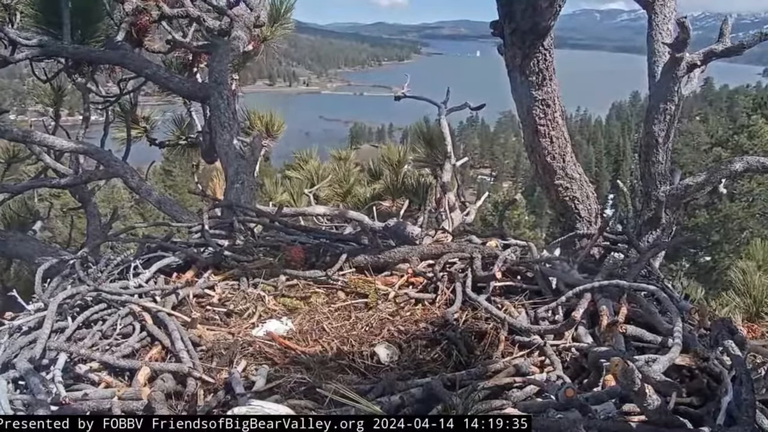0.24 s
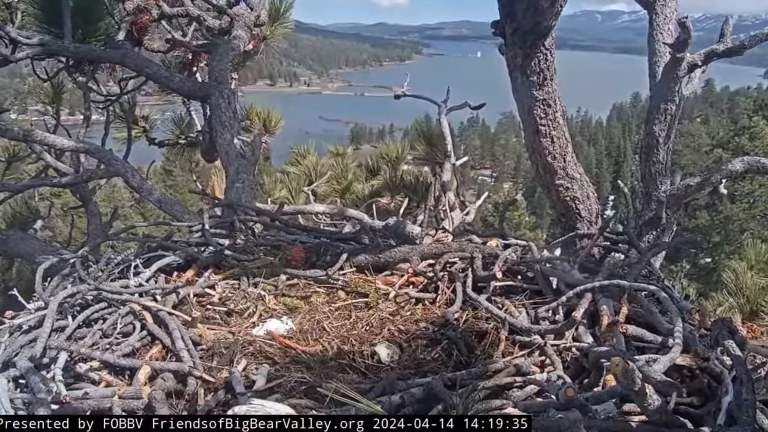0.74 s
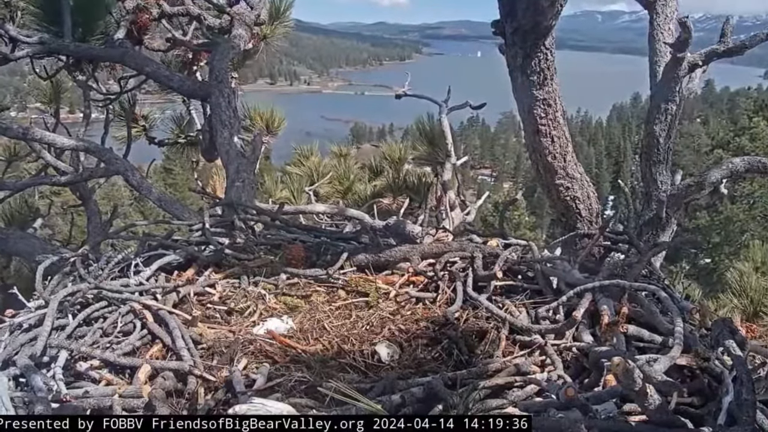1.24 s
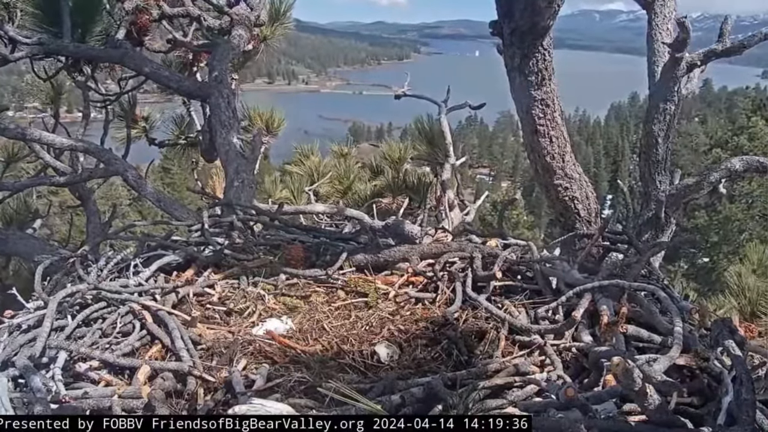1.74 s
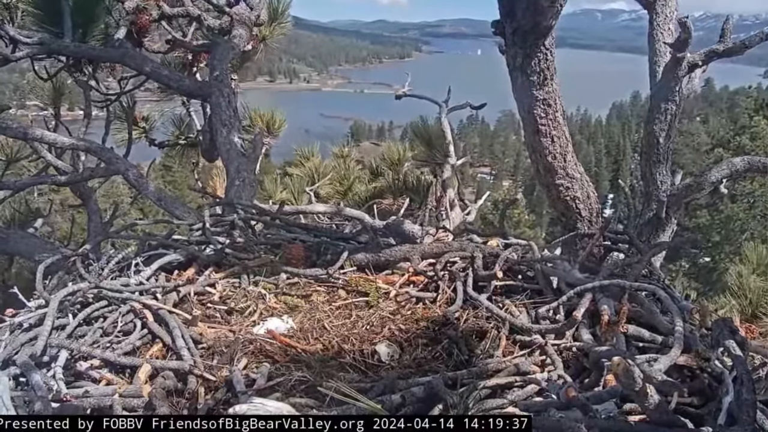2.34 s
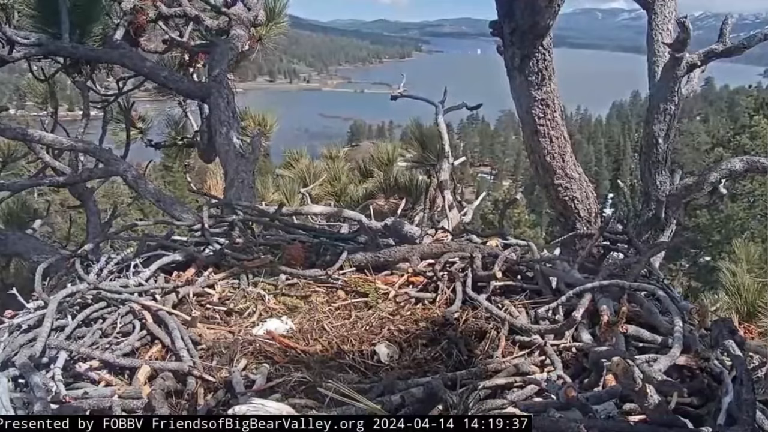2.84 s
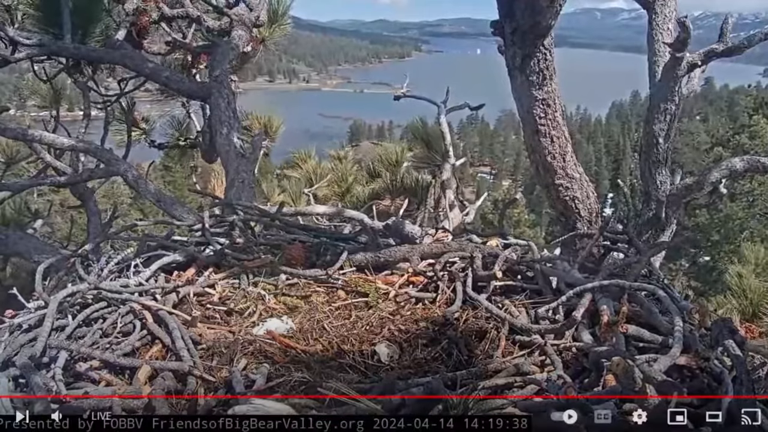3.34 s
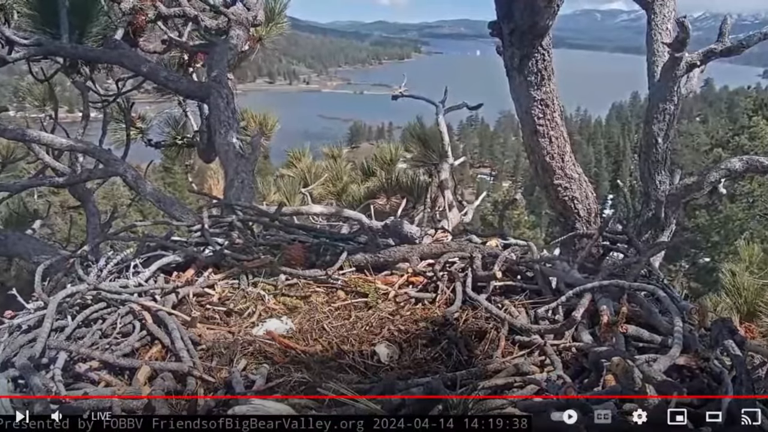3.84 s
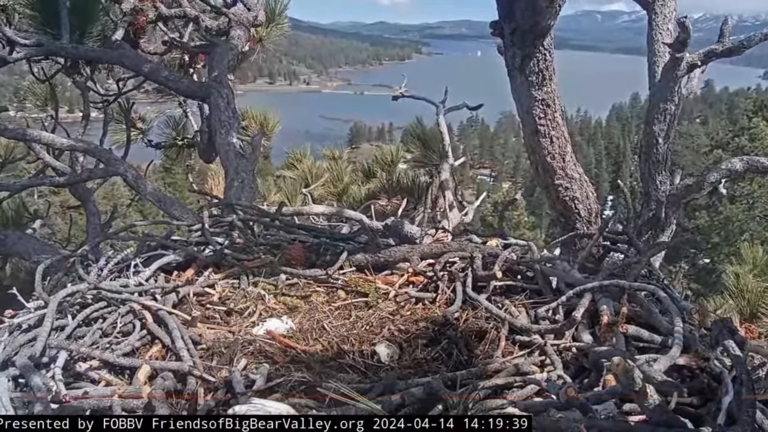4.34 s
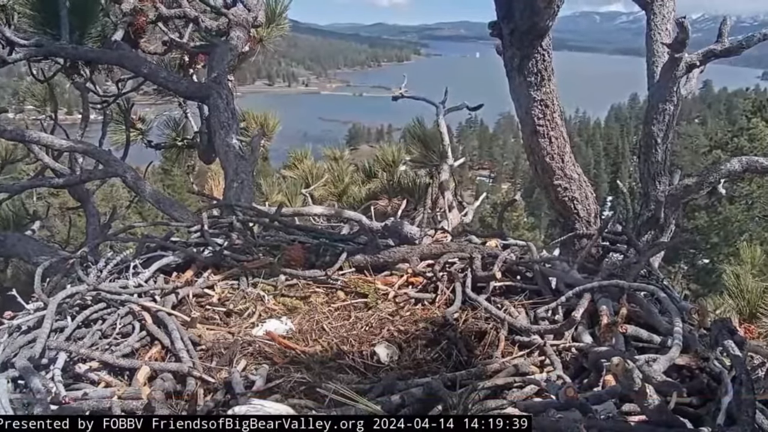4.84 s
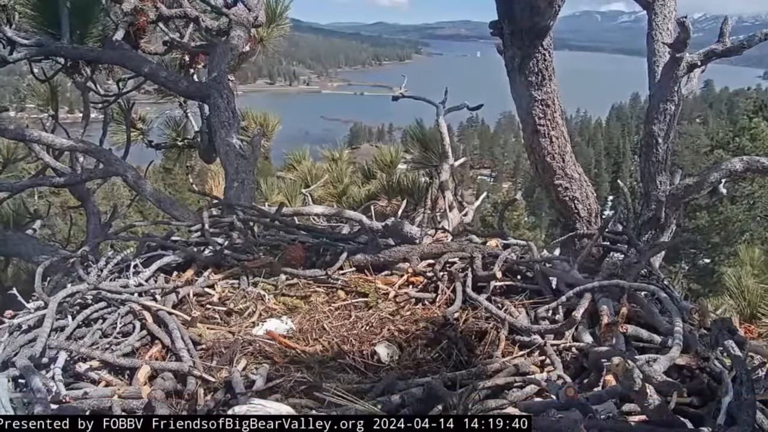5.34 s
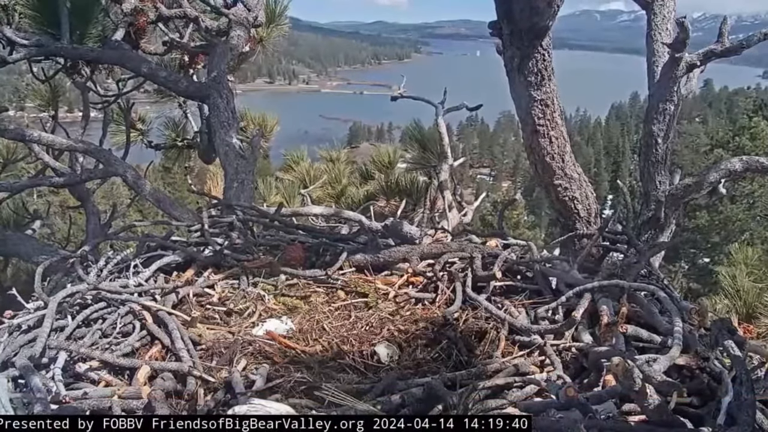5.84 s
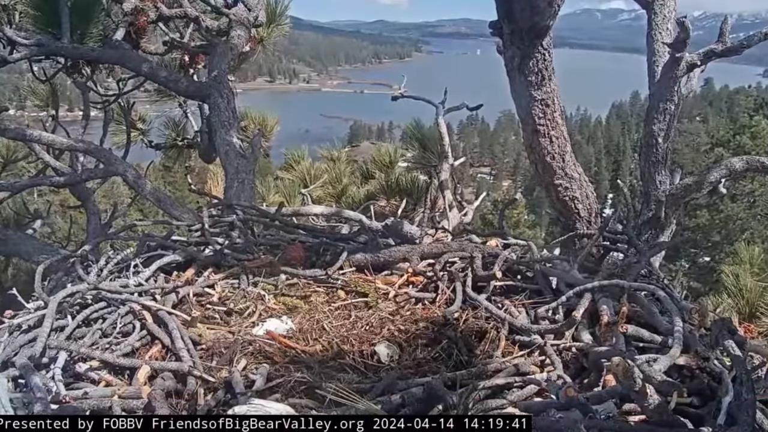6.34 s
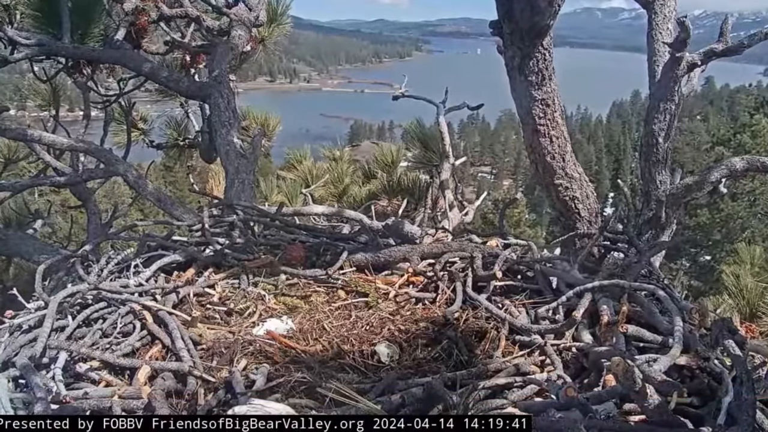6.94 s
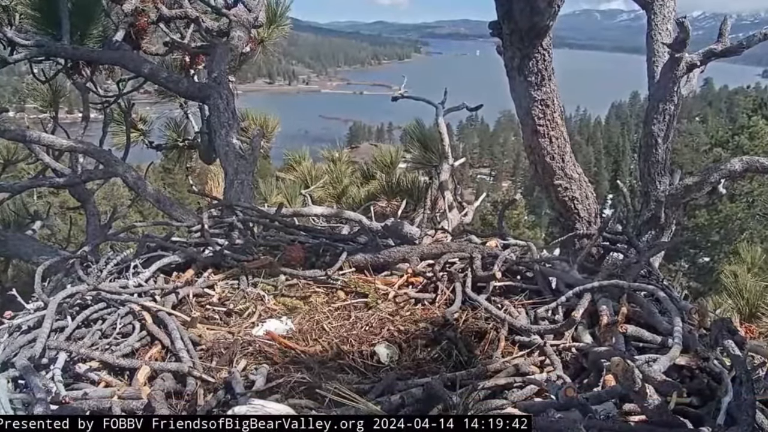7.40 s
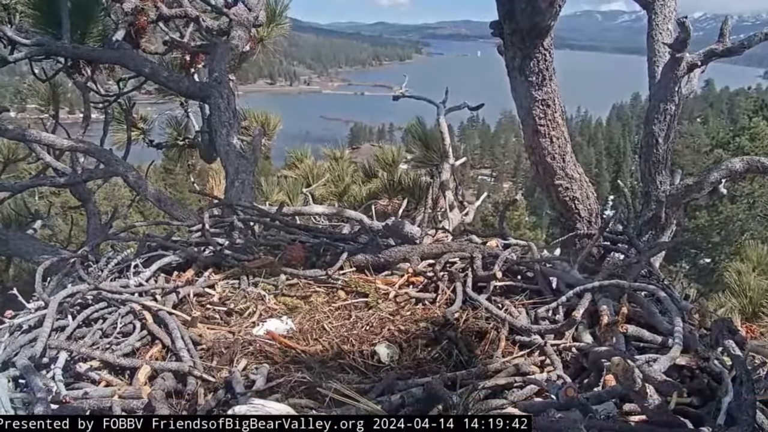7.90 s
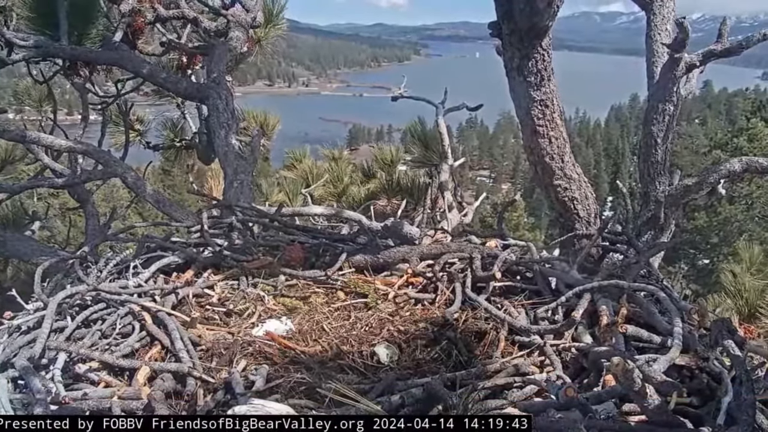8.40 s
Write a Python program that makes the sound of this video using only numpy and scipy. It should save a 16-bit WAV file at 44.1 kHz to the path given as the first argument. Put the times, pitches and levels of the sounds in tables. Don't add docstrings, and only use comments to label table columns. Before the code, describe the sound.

Wind blows through a pine around an open stick nest. A soft needle hiss lies over a deep, uneven rumble buffeting a small sheltered microphone. A nearby bough swishes early, then dry snaps and bright grit ticks cluster in a stronger gust. Past the middle, dull needle flicks patter against bark before things calm somewhat. Tiny dropouts roughen the strongest gusts.

```python
import sys
import numpy as np
from scipy import signal
from scipy.fft import rfft, irfft
from scipy.io import wavfile
from scipy.ndimage import uniform_filter1d

SR = 44100
rng = np.random.default_rng(int(sys.argv[2]) if len(sys.argv) > 2 else 0)


def makeup_ratio(level_db):
    decades = np.asarray(level_db, float) / 20
    return 10 ** decades


def output_pcm(signal):
    pcm = np.clip(np.atleast_2d(signal).T, -1, 1) * 32767
    wavfile.write(sys.argv[1], SR, np.round(pcm).astype(np.int16))


N = 381992

# (frequency [Hz], density [dB per Hz])
SIZZLE_SPECTRUM = [(1710, -6.5), (2900, -7.5), (3330, -4.5), (3910, -4.5), (4590, -1), (5270, -6),
                   (6400, -18), (10800, -29), (12000, -35), (13600, -29.5), (14100, -32), (15300, -58)]
# (time [s], level [dB])
BUSTLE = [
    (0, -10),
    (1.1, -6),
    (1.4, 0),
    (2.3, 7.5),
    (2.8, 5.5),
    (5.0, -3),
    (5.9, 4),
    (6.4, 5.5),
    (7.0, -1.5),
    (8.7, -3),
]


def needle_hiss(hiss_db, push_db, together):
    # (frequency [Hz], density [dB per Hz])
    hiss_spectrum = [(250, -36), (420, -6), (593, -9), (921, -7), (1560, 0), (1880, 1), (2550, -12),
                     (3300, -26), (4290, -53), (7260, -120)]
    return makeup_ratio(hiss_db + 0.77) * needles(hiss_spectrum, together, push_db, shared_db=0.92, own_db=0.06)


def needle_sizzle(push_db, together):
    mean_db, wind_share, bustle_share = -52, 0.48, 0.12
    sizzle_db = mean_db + wind_share * push_db + bustle_share * in_time(BUSTLE)[0] + swish()
    noise = needles(SIZZLE_SPECTRUM, together, push_db, shared_db=0.43, own_db=0.0)
    return makeup_ratio(sizzle_db + 1.0) * (noise + grit())


def needles(spectrum, together, push_db, shared_db, own_db):
    sough_hz, sough_octaves, sough_gain = 1250, 0.28, 0.7
    edges = 300 * 2 ** np.arange(0, 6.1, 0.5)
    white = rng.standard_normal((2, N))
    out = 0
    for k, (low, high) in enumerate(zip(edges, edges[1:])):
        octaves_off = np.log2(np.sqrt(low * high) / sough_hz)
        sough = sough_gain * np.exp(-(octaves_off / sough_octaves) ** 2)
        flicker_db = sough * push_db + shared_db * together + own_db * drift(5.9)
        out = out + band(white[k % 2], low, high) * makeup_ratio(flicker_db)
    return coloured(out, spectrum)


def swish():
    peak_s, rise_s, fall_s, peak_db = 0.3, 0.06, 0.44, 4
    since = np.arange(N) / SR - peak_s
    return peak_db * np.exp(-(since / np.where(since < 0, rise_s, fall_s)) ** 2)


def buffeting(capsule_db, eddy_db):
    # (frequency [Hz], density [dB per Hz])
    buffet_spectrum = [(11, -50), (18, -46), (52, -4), (76, 1.5), (97, 3.5), (170, -14.5), (220, -27.5),
                       (370, -120)]
    return makeup_ratio(capsule_db - 0.5 + eddy_db) * eddies(buffet_spectrum, even=0.19)


def shelter_rumble(capsule_db, eddy_db):
    # (frequency [Hz], density [dB per Hz])
    rumble_spectrum = [(76, -31), (130, -3.5), (188, -4.5), (247, -3), (387, -14), (520, -36.5), (680, -44),
                       (1140, -120)]
    mean_db, wind_share, eddy_yield = -35.5, 0.75, 0.15
    rumble_db = mean_db + wind_share * (capsule_db - capsule_db.mean()) - eddy_yield * eddy_db
    return makeup_ratio(rumble_db) * eddies(rumble_spectrum, even=0.041)


def eddies(spectrum, even):
    x = coloured(rng.standard_normal(N), spectrum)
    swell = uniform_filter1d(np.abs(signal.hilbert(x)), size=300) + 1e-6
    return rms_one(x * swell ** -even)


def big_eddies():
    # (time [s], level [dB])
    strikes = [(0.51, -11), (0.79, -12), (1.21, -2), (1.33, 8), (1.76, 6), (1.81, -9), (2.02, 1),
               (2.12, -9), (2.58, 2.5), (2.77, -11), (3.09, 3), (3.16, -7), (3.67, 4), (3.74, -12),
               (4.05, 8.5), (4.34, 4), (4.8, 4.5), (4.85, -7), (5.26, 6.5), (5.31, -10), (5.37, 8.5),
               (5.86, 3.5), (6.15, -0.5), (6.25, 2.5), (7.33, -3), (8.2, -2), (8.35, -2), (8.47, 4.5),
               (8.54, -3), (8.6, 7.5)]
    half_length_s = 0.03
    t = np.arange(0, N, 40) / SR
    out = 0
    for s, db in strikes:
        out = out + db * np.exp(-((t - s) / half_length_s) ** 2)
    return np.interp(np.arange(N) / SR, t, out)


def capsule_free(push_db, edge_ms, longer_ms):
    # (time [s], duration [ms])
    long_rests = [(1.8926, 4.4), (2.2309, 3.6), (2.4411, 5.8), (2.4501, 4), (2.4622, 4.7), (2.5093, 3.7),
                  (2.5937, 5.6), (3.6237, 3.8), (3.6498, 3.4), (4.0203, 5.54), (5.3956, 3.5),
                  (5.6525, 6.67), (5.7039, 3.4), (6.0967, 4.2), (6.1267, 4), (6.1362, 6.1), (6.1509, 6.8),
                  (6.3986, 7.9), (6.4105, 4.7), (6.4876, 4.6), (6.5482, 5.4), (6.6065, 3.8), (6.6195, 6.2),
                  (6.631, 7.6), (6.6762, 5), (6.9162, 5.1), (7.5433, 4.6), (7.2341, 2.85), (7.9686, 4.6),
                  (8.034, 4.2)]
    touches_per_s, steepness, longest_ms = 6.5, 1.6, 3.3
    free, chance = np.ones(N), rng.random((2, N))
    touched = np.flatnonzero(chance[0] < touches_per_s * makeup_ratio(steepness * push_db) / SR)
    touch_ms = 0.5 + longest_ms * chance[1, touched] ** 1.4
    for s, ms in [*long_rests, *zip(touched / SR, touch_ms)]:
        start = int((s - longer_ms / 2000) * SR)
        end = int((s + (ms + longer_ms / 2) / 1000) * SR)
        free[max(0, start):end] = 0
    return uniform_filter1d(free, max(1, int(edge_ms * SR / 1000)))


def ticks():
    # (frequency [Hz], width [Hz], level [dB])
    side_modes = [(6330, 650, -1), (8000, 700, -11), (9300, 800, -16)]
    # ((low edge [Hz], high edge [Hz]), modes (frequency [Hz], width [Hz], level [dB]))
    fixed_modes = [
        ((1500, 4000), [(2020, 450, 0), (2660, 420, -3), (3420, 480, -6)]),
        ((3900, 5700), [(4480, 640, 0)]),
        ((10000, 15200), [(11000, 1300, 0), (13700, 1500, -6)]),
    ]
    lags_ms = [.8, 0.06, 0.443, 0.94]
    light_db, heavy_db, light_sharper = -32, -20, 0.2
    out = np.zeros(N)
    for s, peak_db, own_hz, *rel_db in snaps() + pings() + flicks():
        impact = tick_impact()
        lightness = np.interp(peak_db + rel_db[1], [light_db, heavy_db], [1, 0])
        sharper = 1 + light_sharper * rng.random() * lightness
        ranges = [((5500, 10000), [(own_hz, 900, 0), *side_modes])]
        for (edges, modes), stretch in zip(fixed_modes, [sharper, sharper, 1]):
            ranges.append((edges, [(hz * stretch, width, db) for hz, width, db in modes]))
        for (edges, modes), range_db, lag_ms in zip(ranges, [0, *rel_db], lags_ms):
            rung = 0
            for hz, width, db in modes:
                rung = rung + makeup_ratio(db) / width * resonance(resonance(impact, hz, width), hz, width)
            rung = band(rung, *edges)
            rung *= makeup_ratio(peak_db + range_db) / np.abs(signal.hilbert(rung)).max()
            start = int(s * SR) - 52 + int(lag_ms * SR / 1000)
            out[start:start + len(rung)] += rung[:N - start]
    return out


def tick_impact():
    tail_db, tail_ms, after_ms, after_gain = -35, 2.2, 0.99, 0.15
    dying = makeup_ratio(tail_db) * np.exp(-np.arange(900) * 1000 / (tail_ms * SR))
    impact = rng.standard_normal(900) * dying
    impact[0] = 1
    after = 4 + (rng.random(2) * after_ms * SR / 1000).astype(int)
    impact[after] = after_gain * rng.uniform(-1, 1, 2)
    return impact


def snaps():
    # (time [s], 5.5-10 kHz peak [dB], 2-3.5 kHz against it [dB], 3.8-5.3 kHz against it [dB])
    twig_snaps = [(0.2301, -36, 16.5, 21.5), (0.3133, -42.5, 15, -4), (0.747, -50, 0, 13),
                  (1.4218, -39, -5, 4), (1.5941, -40, 4, 6), (2.1159, -48.5, 10, 16), (2.2217, -35, -5, 4),
                  (2.237, -40, 3, 2), (2.3195, -42.5, -1, 10.5), (2.5263, -31.5, -14, 5.5),
                  (2.5329, -34.5, 0, 6), (2.5599, -39, -5, 7), (2.5791, -44, -2, 8), (3.137, -45, 23, 26.5),
                  (3.3167, -39, -7, 4), (3.6549, -50, 3, 11), (3.7363, -46.5, 6, 2), (4.0842, -44, -2, 1),
                  (4.841, -41, 11, -2), (4.8714, -57, 12, 21), (4.9662, -44, 1, 6), (7.1126, -50, 11, 8),
                  (7.3795, -60, 15, 19), (7.527, -60, 25, 8), (8.3371, -46, -2, 2), (8.579, -49, 0, 12),
                  (8.6337, -38, -2, 9.5), (8.637, -42, 13, 3)]
    return [(s, db, 5700, low_db, mid_db, -23) for s, db, low_db, mid_db in twig_snaps]


def pings():
    # (time [s], 5.5-10 kHz peak [dB], pitch [Hz], 3.8-5.3 kHz against the peak [dB])
    grit_pings = [(0.1215, -47, 9710, -7), (0.2769, -42, 7340, 1), (0.331, -50, 8800, -5),
                  (1.3083, -42.5, 7240, 6), (1.3829, -27.5, 7700, -2), (1.409, -40, 9500, 6),
                  (1.5117, -44, 8900, 9), (1.7475, -42, 7690, 2), (1.7558, -46, 6720, 5),
                  (1.8121, -50, 7920, 1), (2.1593, -44, 9900, 1), (2.197, -27.5, 7700, -6),
                  (2.2567, -30, 9200, 7.5), (2.306, -50, 6890, 5), (2.365, -48, 9900, 14),
                  (2.9545, -49, 6350, -1), (3.2322, -49, 9900, 3), (3.6931, -47, 8350, 4),
                  (5.2331, -52, 8380, 10), (5.484, -51, 5860, -5), (6.1844, -50, 7620, 5),
                  (7.0817, -41.5, 7860, 7), (7.3404, -30.5, 9150, 14.5), (8.4802, -40, 7210, -8)]
    rows = []
    for s, db, hz, mid_db in grit_pings:
        top_db = -18 + 22 * np.log2(hz / 7000)
        rows.append((s, db, hz, mid_db - 5, mid_db, top_db))
    return rows


def flicks():
    # (time [s], 2.5-4 kHz peak [dB])
    needle_flicks = [(5.2316, -33), (5.2536, -38), (5.294, -39), (5.3254, -32), (5.3868, -35),
                     (5.4267, -39), (5.516, -40), (5.6447, -36), (5.8233, -37), (5.8707, -39),
                     (5.9286, -37), (5.962, -32), (6.0228, -38), (6.0583, -34), (6.0997, -34), (6.175, -35),
                     (6.3162, -40), (6.3586, -34)]
    own_db, low_db, mid_db, top_db = -16, 20.5, 1, -10
    return [(s, db + own_db, 7000, low_db, mid_db, top_db) for s, db in needle_flicks]


def grit():
    per_s, level_db, spread_db, largest, dying_ms = 110, -9.5, 5, 2.7, 1.8
    born = rng.random(N) < per_s * makeup_ratio(in_time(BUSTLE)[0] + 2.5 * drift(3)) / SR
    sizes = born * makeup_ratio(spread_db * np.minimum(rng.exponential(1, N), largest))
    dealt, white = rng.integers(0, 6, N), rng.standard_normal(N)
    dying = np.exp(-1000 / (dying_ms * SR))
    out = 0
    for k, hz in enumerate(np.geomspace(2700, 8500, 6)):
        puffs = signal.lfilter([1], [1, -dying], sizes * (dealt == k) + 1e-18)
        outer_gain = 1 + 0.45 * np.log2(hz / 4600) ** 2
        out = out + band(white * puffs, hz / 1.34, hz * 1.3) * outer_gain
    return makeup_ratio(level_db) * coloured(out, SIZZLE_SPECTRUM)


def rms_one(x):
    return x / np.sqrt(np.mean(x ** 2) + 1e-20)


def in_time(rows):
    s, *columns = np.transpose(rows)
    return [np.interp(np.arange(N) / SR, s, c) for c in columns]


def drift(rate_hz):
    hop = 40
    r = np.exp(-2 * np.pi * rate_hz * hop / SR)
    noise = rng.standard_normal(N // hop + 2002)
    slow = signal.lfilter([1], [1, -2 * r, r * r], noise)[2000:]
    return np.interp(np.arange(N) / hop, np.arange(len(slow)), rms_one(slow))


def coloured(x, spectrum):
    hz, density_db = np.transpose(spectrum)
    bins_hz = np.fft.rfftfreq(len(x), 1 / SR) + 1
    gain = makeup_ratio(np.interp(np.log(bins_hz), np.log(hz), density_db))
    return rms_one(irfft(rfft(x) * gain, len(x)))


def resonance(x, hz, width):
    r = np.exp(-np.pi * width / SR)
    zeros = np.array([1, 0, -1]) * (1 - r * r) / 2
    poles = [1, -2 * r * np.cos(2 * np.pi * hz / SR), r * r]
    return signal.lfilter(zeros, poles, x + 1e-18)


def band(x, low_hz, high_hz, order=2):
    return signal.sosfilt(signal.butter(order, [low_hz, high_hz], "band", fs=SR, output="sos"), x)


def scene():
    # (time [s], force on the capsule [dB], force in the needles [dB])
    wind = [(0.0, -33.5, -39.5), (0.79, -38.5, -39.5), (1.11, -29, -38), (1.16, -36, -38),
            (1.54, -28, -35.5), (2.05, -30, -34.5), (2.53, -25, -33.5), (3.33, -28.5, -37),
            (3.62, -27, -35), (4.0, -28.5, -35), (4.05, -26.5, -34.5), (4.19, -27, -36), (5.93, -26, -34),
            (6.15, -25.5, -34.5), (7.04, -28, -36), (7.28, -30.5, -37.5), (7.94, -26, -36.5),
            (8.66, -30.5, -36.5)]
    capsule_db, hiss_db = in_time(wind)
    push_db = hiss_db - hiss_db.mean()
    eddy_db = big_eddies()
    together = drift(33)
    hiss = needle_hiss(hiss_db, push_db, together)
    sizzle = needle_sizzle(push_db, together)
    low = buffeting(capsule_db, eddy_db) + shelter_rumble(capsule_db, eddy_db)
    free = capsule_free(push_db, edge_ms=0.15, longer_ms=0.18)
    return (low + (hiss + sizzle) * free + ticks())[None]


def band_limit(x):
    return signal.sosfilt(signal.butter(12, 15410, fs=SR, output="sos"), x)


def record(dry):
    mix = signal.sosfilt(signal.butter(8, 15200, fs=SR, output="sos"), dry)
    return band_limit(mix)


dry = scene()
out = record(dry)
output_pcm(out)
```